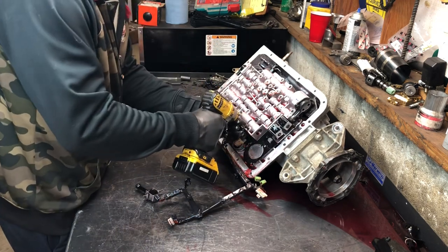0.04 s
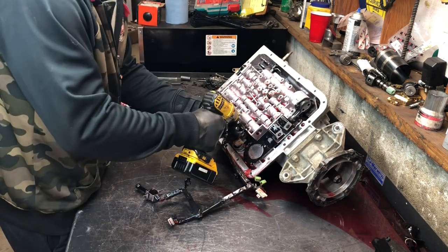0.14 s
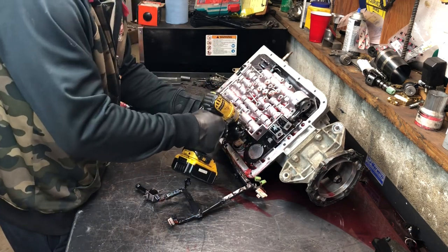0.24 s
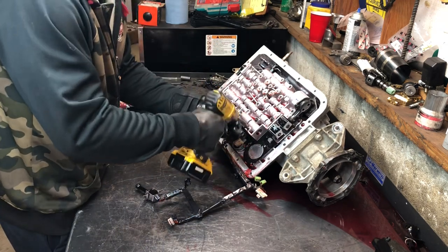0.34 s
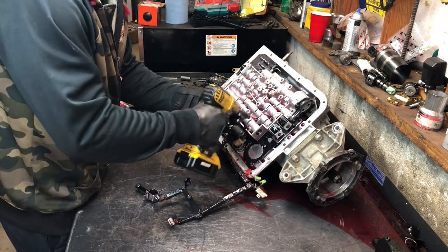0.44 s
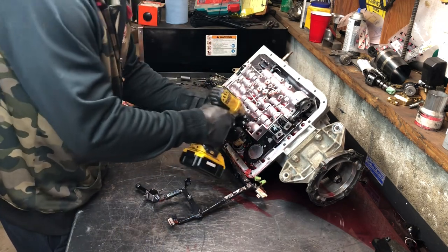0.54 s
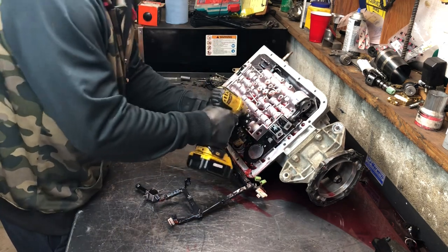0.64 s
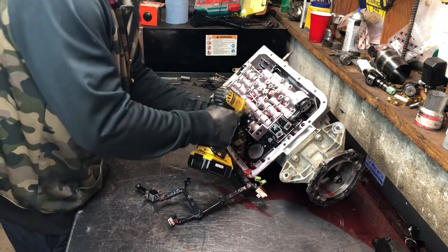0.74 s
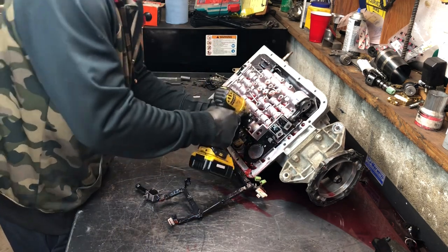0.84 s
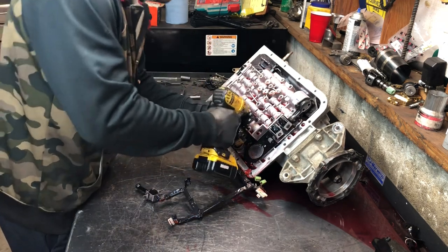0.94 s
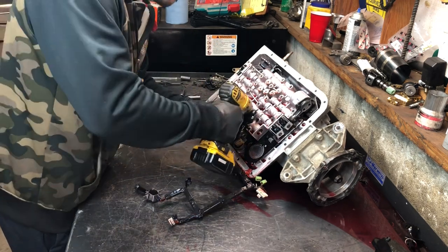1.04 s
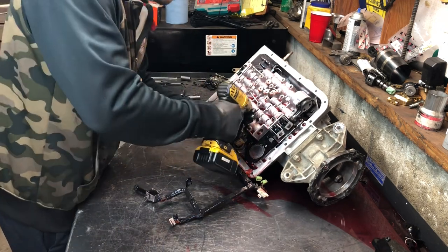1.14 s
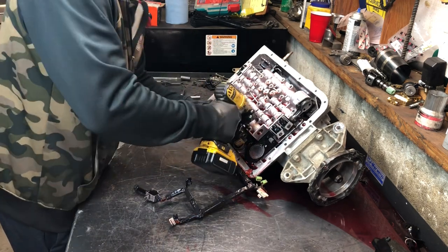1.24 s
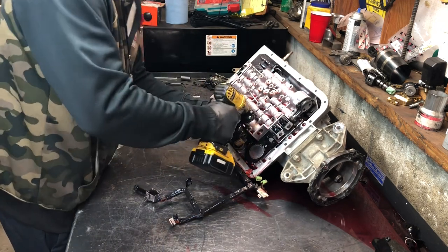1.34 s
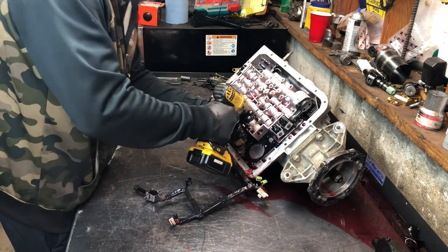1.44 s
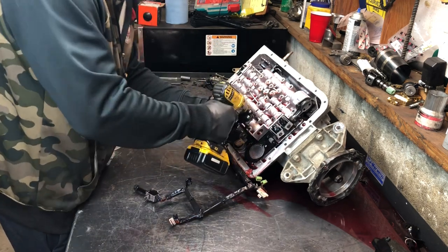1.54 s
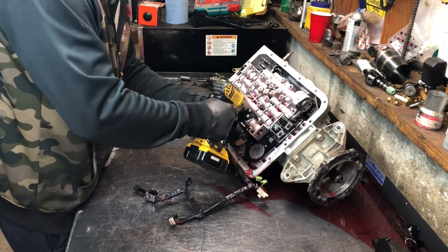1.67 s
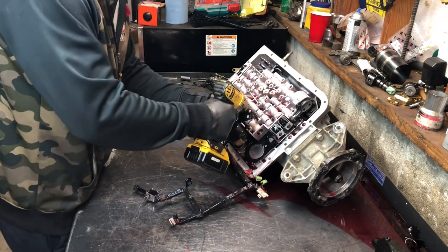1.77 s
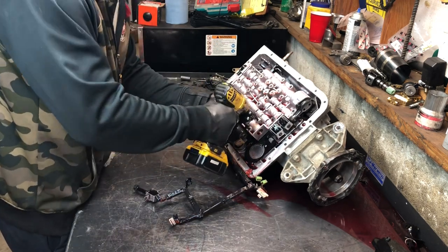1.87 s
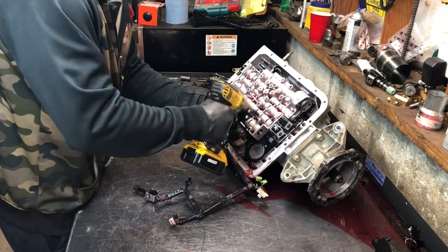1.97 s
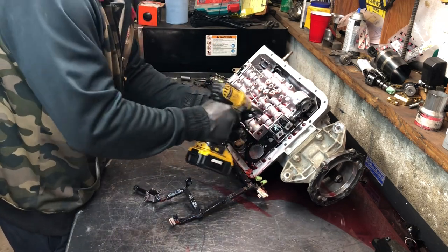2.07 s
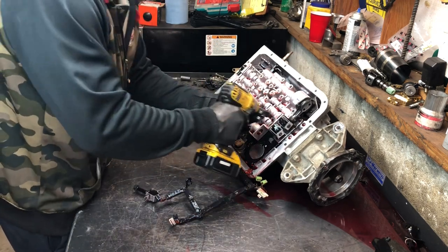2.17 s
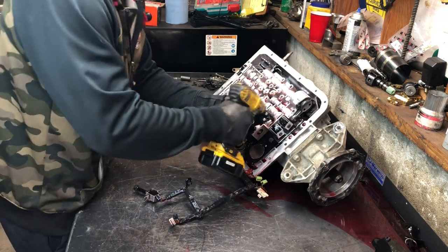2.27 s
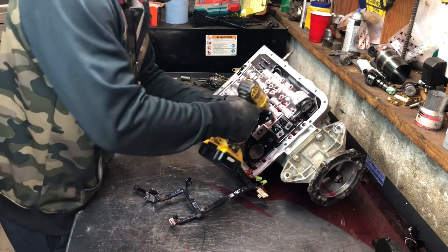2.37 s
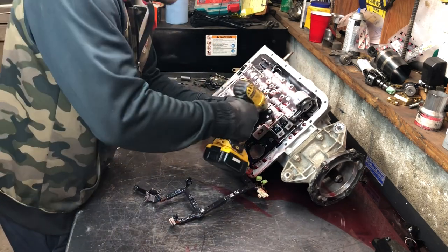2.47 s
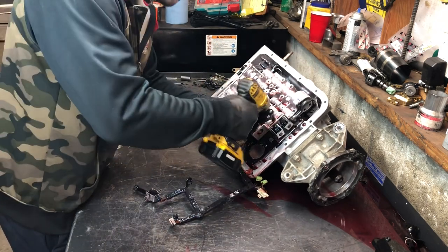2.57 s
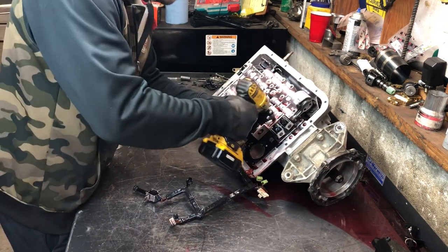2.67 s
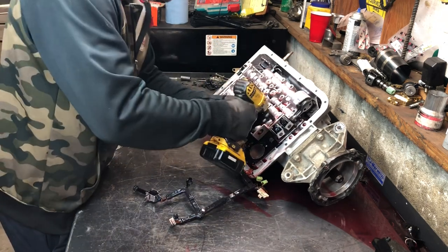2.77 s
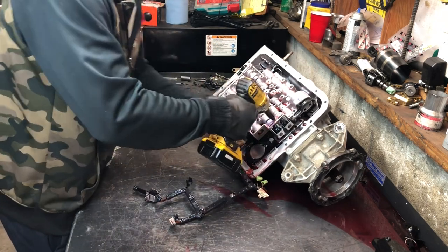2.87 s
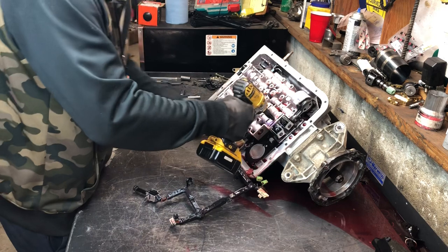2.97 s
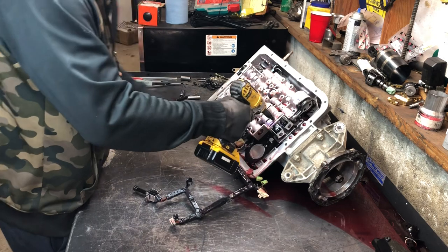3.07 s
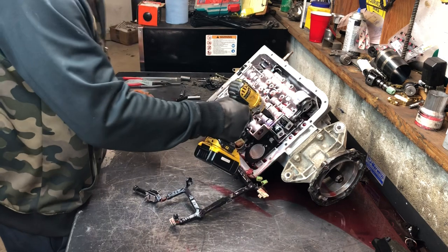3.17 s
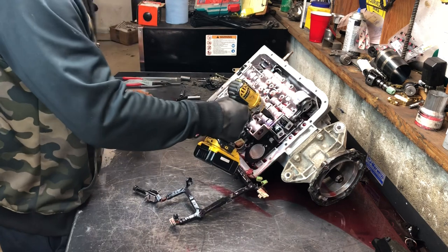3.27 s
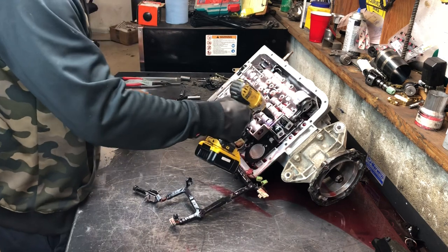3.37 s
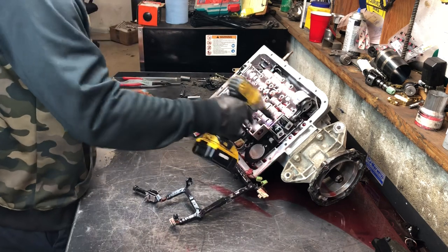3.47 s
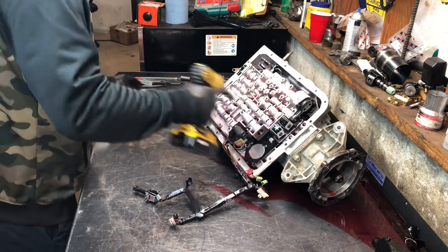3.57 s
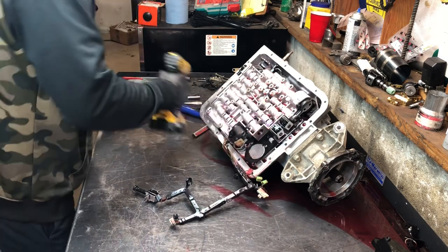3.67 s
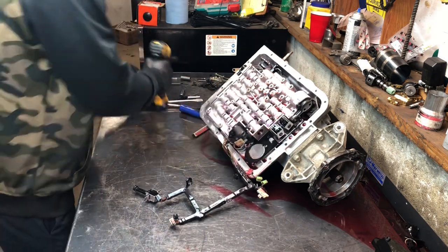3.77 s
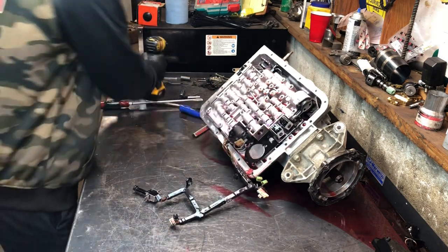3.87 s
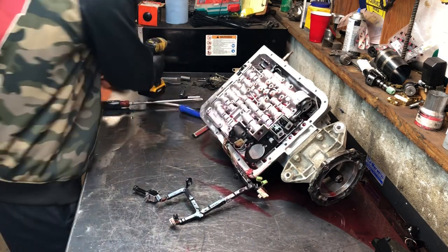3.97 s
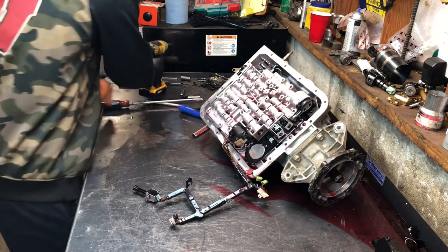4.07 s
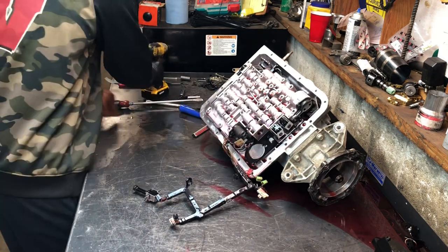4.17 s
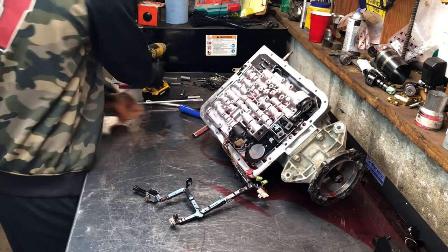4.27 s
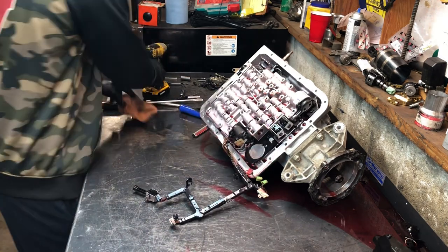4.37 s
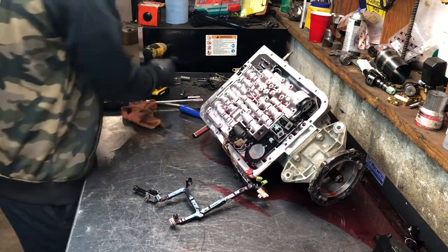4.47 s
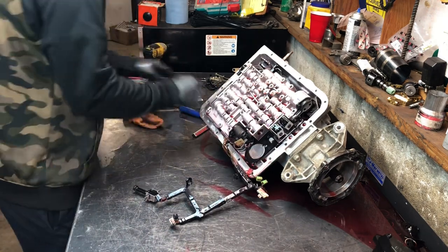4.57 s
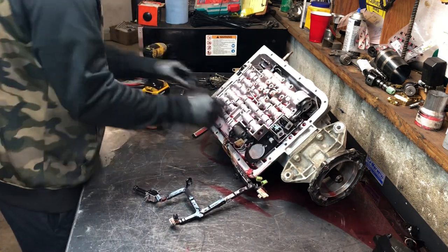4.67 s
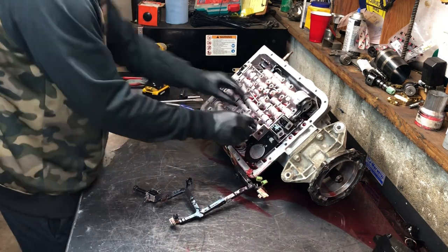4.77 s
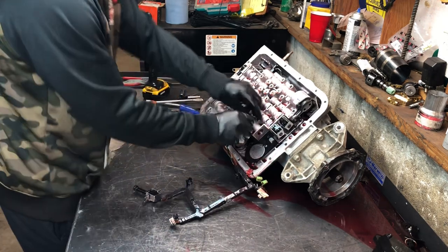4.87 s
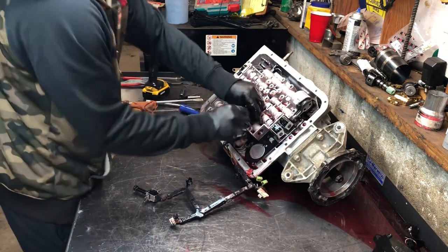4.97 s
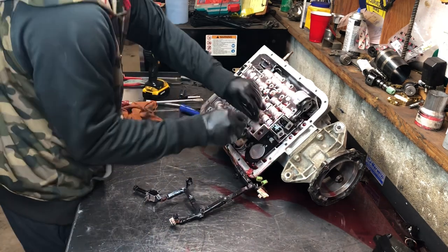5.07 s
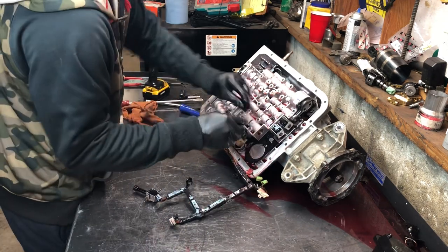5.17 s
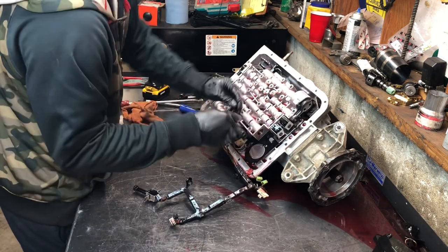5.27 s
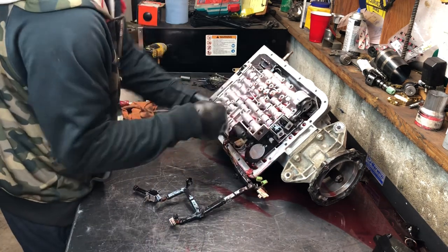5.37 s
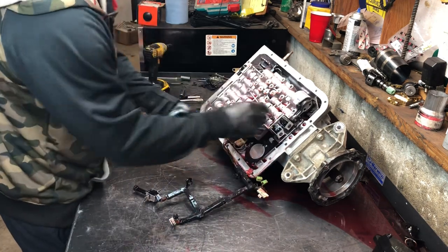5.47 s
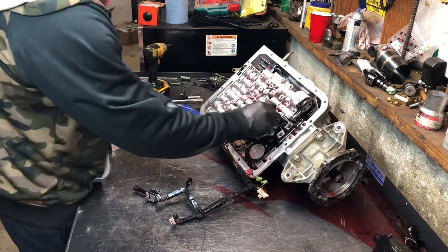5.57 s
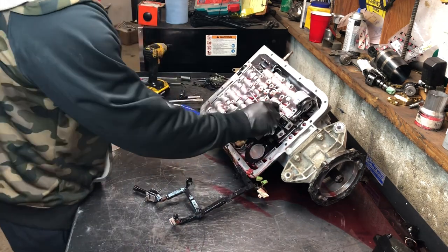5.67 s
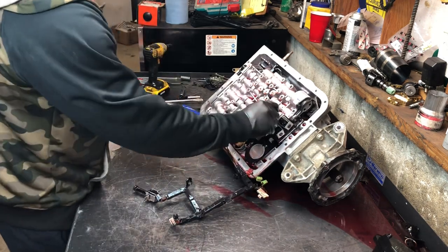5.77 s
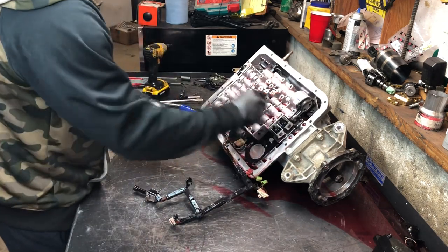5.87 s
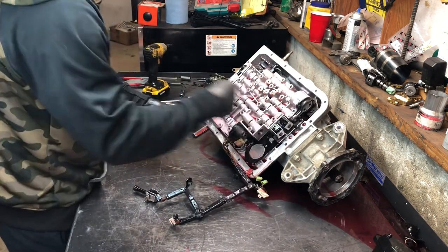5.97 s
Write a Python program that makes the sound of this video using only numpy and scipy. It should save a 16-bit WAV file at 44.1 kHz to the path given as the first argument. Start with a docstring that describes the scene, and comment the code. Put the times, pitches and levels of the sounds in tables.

```python
"""A cordless impact driver spins bolts out of an aluminium transmission on a steel workbench: three runs.
Gear-tooth harmonics whine over pulsed noise; hammer blows are noise cracks with ringing modes.
The socket knocks on metal, a heavy bolt clatters on the bench, the driver is stood down and rattles.
Gloves and cloth brush as noise, then loose bolts clink and scrape in the hand.
A small hard workshop adds reflections, a diffuse tail, standing waves, ventilation noise and hum."""
import sys
import numpy as np
from scipy import signal
from scipy.fft import rfft, irfft
from scipy.io import wavfile
from scipy.ndimage import uniform_filter1d

SR = 44100
rng = np.random.default_rng(int(sys.argv[2]) if len(sys.argv) > 2 else 0)


def to_wav(sig):
    """Store sig (one row per channel, or 1-D mono) as 16-bit WAV at the path in sys.argv[1].

    Samples outside -1..1 are clipped; the rate is SR.
    """
    pcm = np.clip(np.atleast_2d(sig), -1, 1) * 32767
    pcm = np.round(pcm).astype(np.int16)
    wavfile.write(sys.argv[1], SR, pcm.T)  # frames by channels


N = 265466
T = np.arange(N) / SR
HIT = T[:SR]  # time axis of one event, 1 s


def undb(db):
    """Decibels to gain."""
    return 10 ** (np.asarray(db) / 20)


def unit(x):
    """Scale to rms 1."""
    return x / np.sqrt(np.mean(x ** 2))


def noise():
    """White noise for the whole scene."""
    return rng.standard_normal(N)


def fade(t, t60):
    """Exponential decay that begins at t = 0."""
    return np.exp(-np.log(1000) * np.maximum(t, 0) / t60)


def gate(start, end, rise, t60):
    """Swell from the start, hold, and die away after the end."""
    return np.clip((T - start) / rise, 0, 1) * fade(T - end, t60)


def walk(rate):
    """Smoothed random drift of rms 1, with rate new values per second."""
    size = max(int(SR / rate), 1)
    steps = np.repeat(rng.standard_normal(N // size + 1), size)
    return unit(uniform_filter1d(steps, size)[:N])


def colour(x, points, tilt_db=0, size=4096):
    """Causal minimum-phase filter of unit power through (Hz, dB) points, tilted in dB per octave."""
    octave = np.log2(np.maximum(np.fft.rfftfreq(size, 1 / SR), 1))
    hz, db = np.transpose(points)
    gain = unit(undb(np.interp(octave, np.log2(hz), db) + tilt_db * octave))
    # fold the cepstrum to put all energy as early as possible
    cepstrum = irfft(np.log(gain + 1e-9))
    cepstrum[1:size // 2] *= 2
    cepstrum[size // 2 + 1:] = 0
    impulse = irfft(np.exp(rfft(cepstrum)))
    return signal.fftconvolve(x, impulse)[:len(x)]


def ring(modes):
    """Struck modes; every blow shares its force among them a little differently."""
    shares = undb(rng.standard_normal(len(modes))) * rng.choice([-1, 1], len(modes))
    out = np.zeros(len(HIT))
    for share, (hz, db, t60) in zip(shares, modes):
        out += share * undb(db) * np.sin(2 * np.pi * hz * HIT) * fade(HIT, t60)
    return out


def add(track, s, sound):
    """Mix a sound in at time s."""
    start = int(s * SR)
    track[start:start + len(sound)] += sound[:N - start]


RING_DB = -21  # gain of the lasting ring beside the crack, before any muting


def strikes(rows, points, modes, rise, mute_db=0):
    """Each blow (s, dB, tilt dB per octave, crack t60 s): a noise crack plus the few modes that ring on."""
    out = np.zeros(N)
    for s, db, tilt_db, t60 in rows:
        force = np.tanh(2 * rng.standard_normal(len(HIT))) * 1.25
        crack = colour(force * fade(HIT, t60), points, tilt_db)
        lasting = undb(RING_DB + mute_db) * ring(modes)
        add(out, s, undb(db) * (crack + lasting) * np.minimum(HIT / rise, 1))
    return out


# Ventilation spectrum. Each row: frequency in Hz, relative density in dB per Hz.
SHOP_COLOUR = [(18, -24.5), (30, 8.5), (244, -4), (294, -2), (372, -1), (795, -6), (860, -8), (1340, -3.5),
               (1840, -9.5), (2210, -10.5), (2950, -12.5), (3830, -12.5), (15800, -28.5)]
SHOP_DB = -60


def shop():
    """Steady ventilation noise with a faint mains hum at 119 Hz and a wavering tone at 958 Hz."""
    air = colour(noise(), SHOP_COLOUR) * undb(SHOP_DB + .6 * walk(2))
    hum = undb(-71.5) * np.sin(2 * np.pi * 119 * T)
    tone = undb(-73.5 + 3 * walk(9.8)) * np.sin(2 * np.pi * 958 * T)
    return air + hum + tone


# Tight bolts that need the hammer. Each row: first blow in seconds, breaks loose in seconds, blows per second.
TIGHT_BOLTS = [(1.0622, 1.2011, 31.8), (2.611, 2.779, 32.3)]
RECOVER_S = .19  # time constant


def thread_drag():
    """Drag on the motor, 0-1: full while a bolt is tight, easing off once it has broken loose."""
    drags = []
    for first, loose, _ in TIGHT_BOLTS:
        easing = np.exp(-np.maximum(T - loose, 0) / RECOVER_S)
        drags.append((T > first - .1) * easing)
    return np.max(drags, axis=0)


# Trigger pulls. Each row: start in seconds, release in seconds, level in dB, free-running gear mesh in Hz,
# whine in dB re gear noise, bolt comes free in seconds, its wobble in dB, case drone in dB, brake squeal in dB.
TRIGGER_PULLS = [(-.2, 0.424, -30, 1292, -9, .17, -41, -52, -39),
                 (1.04, 2.023, -28.5, 1312, -5, 1.76, -46, -59.5, -40),
                 (2.595, 3.484, -28.5, 1302, -4, 3.16, -41, -44, -45.5)]
# Gear whine. Each row: multiple of the mesh, level running free in dB, level under load in dB.
WHINE_HARMONICS = [(1, -7, -7.5), (2, -12.5, -5.5), (3, -13, -11), (4, -14, -11), (5, -20, -21),
                   (6, -18, -21)]
# Gear noise and loose-bolt spectra. Each row: frequency in Hz, relative density in dB per Hz.
GEAR_COLOUR = [(40, -23.5), (80, -9.5), (160, -21.5), (230, -15.5), (350, -9.5), (600, -23), (860, -11),
               (1050, -15), (1300, -9.5), (1900, -14), (3200, -9), (3750, -8), (5050, -6), (5600, -9.5),
               (7400, -7), (8500, -10.5), (15800, -12.5)]
WOBBLE_COLOUR = [(50, -20), (90, -7), (155, -2), (230, -3), (360, -2), (600, -12), (850, -1), (1400, -4),
                 (3000, -10), (8000, -26)]
SAG_HZ = 135  # loss of mesh frequency at full drag
WHINE_FLUTTER = .0045  # share of the pitch
WHINE_DRAG_DB, WHINE_FREE_DB = 3, -3.5  # lift at full drag, drop once the bolt is free


def driver(run):
    """One trigger pull: gear teeth whine and rattle, the freed bolt wobbles, the brake stops the motor."""
    start, release, db, mesh_hz, whine_db, free, wobble_db, drone_db, brake_db = run
    drag = thread_drag()
    speed_hz = mesh_hz - SAG_HZ * drag
    load = np.minimum(2 * drag, 1)
    hz = speed_hz * fade(T - release, 1.6) * (1 + WHINE_FLUTTER * walk(70))
    teeth = 2 * np.pi * np.cumsum(hz) / SR
    spindle = teeth / 32

    # load presses the teeth together, which lifts the octave
    whine = np.zeros(N)
    for k, free_db, loaded_db in WHINE_HARMONICS:
        level_db = free_db + load * (loaded_db - free_db) + 2 * walk(50)
        whine += undb(level_db) * np.sin(k * teeth + .07 * k * walk(150))
    whine *= undb(WHINE_DRAG_DB * drag + WHINE_FREE_DB * np.clip((T - free) / .15, 0, 1))

    # rattle pulses with each tooth and swells with each spindle turn
    pulses = (1 + .5 * np.sin(teeth)) * (1 + .16 * np.sin(spindle))
    rattle = noise() * pulses * undb(1.3 * walk(300))
    # tooth errors repeat every turn: a dense comb of faint lines
    errors = rng.standard_normal(int(SR / 40))
    turning = np.interp(spindle / (2 * np.pi), np.arange(len(errors)) / len(errors), errors, period=1)
    gear_noise = colour(unit(rattle + 0.65 * turning), GEAR_COLOUR)
    gears = undb(db) * (gear_noise + undb(whine_db) * whine) * gate(start, release, 0.033, 0.23)

    # out of its thread the bolt knocks about, and the case drones on the bench
    knocking = noise() * undb(3.5 * np.sin(spindle / 2) + 2 * walk(90))
    wobble = undb(wobble_db) * colour(knocking, WOBBLE_COLOUR)
    drone_colour = [(90, -32.5), (135, -8.5), (152, 4.5), (172, -5), (260, -34), (900, -69.0)]
    drone = undb(drone_db) * colour(noise(), drone_colour)
    freed = (wobble + drone) * gate(free, release - .03, 0.01, 0.11)

    squeal_colour = [(900, -32.0), (1250, -15), (1620, -6), (1900, -10.5), (3000, -36.5)]
    squeal = undb(brake_db) * colour(noise(), squeal_colour)
    return gears + freed + squeal * gate(release, release + 0.051, 0.013, 0.14)


# The socket knocks on metal as it is seated, fumbled about or lifted off.
# Each row: time in seconds, level in dB, crack t60 in seconds.
SOCKET_KNOCKS = [(.6688, -16, .026), (.899, -43, 0.018), (1.01, -37.5, 0.063), (1.0559, -18, 0.023),
                 (2.2975, -18, .031), (2.463, -45, 0.12), (2.5619, -35, 0.066), (3.468, -33, 0.062),
                 (3.497, -32, 0.14)]
# Socket crack spectrum. Each row: frequency in Hz, relative density in dB per Hz.
SOCKET_COLOUR = [(50, -29), (110, -15), (400, -10), (700, -10), (900, -0.5), (1400, -2), (2150, -7.5),
                 (2850, -2.5), (4300, -10), (6800, -15.5), (8600, -20.5), (9800, -13), (11300, -24),
                 (15800, -38.5)]
# Transmission case. Each row: mode in Hz, level in dB, t60 in seconds.
CASE_MODES = [(915, -2, .19), (1071, -1, .16), (1400, -7, .1), (1739, -18, .3), (2826, -12, .25),
              (3025, -5, .1), (3440, -20, .2), (4070, -13, .1), (4942, -11, .07), (9500, -21, .26),
              (9798, -15, .2)]
KNOCK_TILT_DB_PER_OCTAVE = -1.07
SLACK_DB, SLACK_T60_S = -25, 0.12


def socket():
    """The socket knocks on the case as it is handled, and takes up its slack when the motor starts."""
    knocks = [(s, db, KNOCK_TILT_DB_PER_OCTAVE, t60) for s, db, t60 in SOCKET_KNOCKS]
    slack = [(start, SLACK_DB, 0, SLACK_T60_S) for start, *_ in TRIGGER_PULLS if start > 0]
    return strikes(knocks + slack, SOCKET_COLOUR, CASE_MODES, rise=0.00065)


# A heavy bolt drops, tumbles and knocks. Each row: time in seconds, level in dB, crack t60 in seconds.
CLATTER = [(3.787, -27.5, 0.061), (3.803, -28.5, .11), (3.833, -31.5, 0.32), (3.891, -33, .15),
           (3.9273, -4.5, 0.033), (3.945, -20, 0.13)]
# Low thud spectrum. Each row: frequency in Hz, relative density in dB per Hz.
THUD_COLOUR = [(30, -18.5), (85, -2), (200, -4.5), (300, -1.5), (450, -0.5), (700, -2), (1200, -4.5),
               (2200, -15.5), (5000, -27.5), (15000, -46.5)]
# Bench top and its load of tools. Each row: mode in Hz, level in dB, t60 in seconds.
BENCH_MODES = [(82, 0, .25), (132, -5, .35), (215, -8, .35), (295, -7, .35), (440, -3, .22), (472, -4, .22),
               (614, -4, .28), (668, -9, .3), (795, -5, .28), (856, -7, .3), (925, -6, .3), (1061, -8, .3),
               (1222, -6, .3), (1335, -12, .3), (1440, -11, .3)]
KNOCK_BOOM_DB, CLATTER_BOOM_DB = -27, -17  # re the knock
BOOM_TILT_DB_PER_OCTAVE, BOOM_T60_S = -1.5, 0.3


def bench_boom():
    """The steel top booms softly under every listed knock of socket or dropped bolt."""
    knocks = [(s, db + KNOCK_BOOM_DB) for s, db, _ in SOCKET_KNOCKS]
    knocks += [(s, db + CLATTER_BOOM_DB) for s, db, _ in CLATTER]
    rows = [(s, db, BOOM_TILT_DB_PER_OCTAVE, BOOM_T60_S) for s, db in knocks]
    return strikes(rows, THUD_COLOUR, BENCH_MODES, rise=0.0036)


# Hammer blow spectrum. Each row: frequency in Hz, relative density in dB per Hz.
ANVIL_COLOUR = [(30, -35.5), (70, -12.5), (350, -13.5), (650, -12), (900, -2), (1450, -1), (2200, -0.5),
                (3850, 1), (7000, -4.5), (9200, -12.5), (12000, -13.5), (15800, -19)]
# Anvil. Each row: mode in Hz, level in dB, t60 in seconds.
ANVIL_MODES = [(1456, -4, 0.17), (1900, -5.5, .06), (3240, -8, 0.062), (3790, 0.5, 0.11), (4410, -13, .08)]
# the first blow bites, the rest bounce off hard, the last gives way dully; tilts in dB per octave
FIRST_BLOW_DB, FIRST_TILT_DB = -5.5, 0.4
BLOW_DB, BLOW_TILT_DB, BLOW_SCATTER_DB = -8, 5.5, 1.9
LAST_BLOW_DB, LAST_TILT_DB = -9, -0.5
BLOW_T60_S, CAM_DB = 0.025, -18
HAMMER_BOOM_DB = -30.5  # re the blow


def hammer():
    """The hammer hits the anvil at a steady rate until the bolt gives, grinding up its cam in between."""
    blows, strain = [], 0
    for first, loose, rate in TIGHT_BOLTS:
        beats = np.arange(first, loose, 1 / rate)
        blows.append((first, FIRST_BLOW_DB, FIRST_TILT_DB, BLOW_T60_S))
        blows.append((loose, LAST_BLOW_DB, LAST_TILT_DB, BLOW_T60_S))
        for s in beats[1:]:
            db = BLOW_DB + BLOW_SCATTER_DB * rng.standard_normal()
            blows.append((s, db, BLOW_TILT_DB, BLOW_T60_S))
        # free rebound after each blow: the grinding dips
        rebound = sum(np.exp(-((T - s - .009) / .006) ** 2) for s in beats)
        strain = strain + undb(CAM_DB - 8 * rebound) * gate(first, loose, .004, 0.24)
    grind = colour(noise() * undb(3.5 * walk(220)), ANVIL_COLOUR, tilt_db=-0.45)
    boom_rows = [(s, db + HAMMER_BOOM_DB, BOOM_TILT_DB_PER_OCTAVE, BOOM_T60_S) for s, db, *_ in blows]
    boom = strikes(boom_rows, THUD_COLOUR, BENCH_MODES, rise=.005, mute_db=-3)
    return strikes(blows, ANVIL_COLOUR, ANVIL_MODES, rise=0.00013) + boom + strain * grind


# Bolt-on-bench crack spectrum. Each row: frequency in Hz, relative density in dB per Hz.
BENCH_COLOUR = [(35, -21), (60, -22.5), (632, -11), (780, -3), (985, -6.5), (1460, -8), (1980, -8.5),
                (2180, -9), (3810, -10.5), (4090, -10.5), (5800, -9), (15800, -33.5)]
CLATTER_TILT_DB_PER_OCTAVE = 3  # hardest contact
TILT_LOSS_PER_DB = 0.21  # fall of that tilt per dB of lost force


def dropped_bolt():
    """A bolt clatters, harder contacts brighter, with only a faint ring beside each crack."""
    hardest_db = max(db for _, db, _ in CLATTER)
    contacts = []
    for s, db, t60 in CLATTER:
        tilt_db = CLATTER_TILT_DB_PER_OCTAVE - TILT_LOSS_PER_DB * (hardest_db - db)
        contacts.append((s, db, tilt_db, t60))
    return strikes(contacts, BENCH_COLOUR, BENCH_MODES, rise=.0002, mute_db=-14)


# The driver rocks as it is stood down. Each row: contact in seconds, socket rattle in dB.
ROCKING = [(4.174, -26), (4.185, -15), (4.1911, -6.5), (4.211, -17), (4.2345, -7), (4.2566, -11.5),
           (4.341, -32)]
# Rattle spectrum. Each row: frequency in Hz, relative density in dB per Hz.
TOOL_COLOUR = [(100, -22), (1200, 2.5), (3700, -8), (4400, -2), (4900, -4), (5400, -5.5), (6150, -11.5),
               (6800, 0.5), (7400, -9), (7900, -6.5), (8700, -12), (11000, -22), (15800, -26)]
# Driver and socket. Each row: mode in Hz, level in dB, t60 in seconds.
TOOL_MODES = [(4420, -5, .09), (5350, -8, .07), (6750, -2, .08), (6795, 0, .08), (7900, -5, .07)]
RATTLE_TILT_DB_PER_OCTAVE, RATTLE_T60_S = 2.5, 0.032
THUD_DB, THUD_T60_S = -12, 0.12  # level at the first contact
SETTLE_DB_PER_S, DULLING_DB_PER_OCTAVE_S = 79, 22.5


def stood_down():
    """Each contact rattles the socket, now harder, now lighter, over thuds that grow weaker and duller."""
    landing = ROCKING[0][0]
    rattles = [(s, db, RATTLE_TILT_DB_PER_OCTAVE, RATTLE_T60_S) for s, db in ROCKING]
    thuds = []
    for s, _ in ROCKING:
        settled = s - landing
        thud_db = THUD_DB - SETTLE_DB_PER_S * settled
        thuds.append((s, thud_db, -DULLING_DB_PER_OCTAVE_S * settled, THUD_T60_S))
    shaking = strikes(rattles, TOOL_COLOUR, TOOL_MODES, rise=0.00045, mute_db=-9.5)
    return shaking + strikes(thuds, THUD_COLOUR, BENCH_MODES, rise=0.003, mute_db=-0.5)


def sleeves():
    """Cloth and gloves brush softly, as fluctuating noise, while the arms reach for the bolts."""
    brush = colour(noise(), [(200, -9), (900, 5.5), (3000, -2.5), (7000, -8), (15000, -19.5)])
    return brush * undb(-66.5 + 3.2 * walk(19) + 2 * walk(200)) * gate(4.47, 5.5, 0.21, .5)


# Sliding steel spectrum. Each row: frequency in Hz, relative density in dB per Hz.
STEEL_COLOUR = [(150, -21.5), (700, -20), (1000, -10.5), (2100, -17), (2900, -12), (5800, -15),
                (6900, -6.5), (8200, -15.5), (12000, -18), (15800, -13.5)]


def slips(length, swell_db=0):
    """Steel slides on steel in tiny slips for the given time."""
    grain = rng.standard_normal(len(HIT)) * undb(1.75 * walk(700)[:len(HIT)])
    swell = undb(swell_db * np.minimum(HIT / length - 1, 0))
    return colour(grain * swell * fade(HIT - length, 0.019), STEEL_COLOUR)


# Loose bolts tap each other. Each row: time in seconds, click in dB, ring in dB, glove damping t60 in seconds.
CLINKS = [(4.9945, -47.5, -47, .2), (5.051, -36, -25, 0.089), (5.1237, -40, -48, .1),
          (5.5357, -35.5, -27.5, 1.5), (5.6796, -53.5, -44, .6), (5.849, -47.5, -62, .1),
          (5.948, -37.5, -37, .1)]
# Threads slide over each other. Each row: start in seconds, length in seconds, level in dB.
SCRAPES = [(5.021, .045, -34.5), (5.161, 0.043, -40), (5.936, 0.026, -40)]
# Hanging bolt shank before glove damping. Each row: mode in Hz, level in dB, t60 in seconds.
BOLT_MODES = [(6901, -12, .45), (6950, -7, .12), (6870, 1, .055), (6729, -24, .3), (7908, -32, .3)]
CLINK_S, SCRAPE_SWELL_DB = 0.0018, 7


def bolts():
    """Bolts in the hand tap and ring, and scrape thread on thread, harder towards the end."""
    out = np.zeros(N)
    for s, click_db, ring_db, t60 in CLINKS:
        click = undb(click_db) * slips(CLINK_S)
        damped_ring = undb(ring_db) * ring(BOLT_MODES) * fade(HIT, t60)
        add(out, s, click + damped_ring)
    for s, length, db in SCRAPES:
        add(out, s, undb(db) * slips(length, SCRAPE_SWELL_DB))
    return out


# Decay of the workshop. Each row: frequency in Hz, t60 in seconds.
ROOM_T60 = [(60, .85), (160, .66), (420, .56), (1100, .56), (2900, .55), (5000, .52), (8000, .37),
            (15000, .23)]
# Standing waves. Each row: mode in Hz, level in dB, t60 in seconds.
ROOM_MODES = [(88.5, 0, .75), (140, -2, .6), (165, -7, .5), (226, -9, .5)]


def room(x, wet_db, early_db, boom_db):
    """Quick reflections, a diffuse tail whose treble dies first, and slowly building standing waves."""
    hz, t60s = np.transpose(ROOM_T60)
    log_hz = np.log(np.maximum(np.fft.rfftfreq(len(HIT), 1 / SR), 1))
    spectrum = rfft(rng.standard_normal(len(HIT)))
    # overlapping bands, each with its own decay
    tail = np.zeros(len(HIT))
    for share, t60 in zip(np.eye(len(hz)), t60s):
        band = irfft(spectrum * np.interp(log_hz, np.log(hz), share), len(HIT))
        tail += band * fade(HIT, t60)
    tail = unit(tail * np.minimum(HIT / 0.014, 1))
    # sparse echoes off bench and wall
    echoes = rng.standard_normal(len(HIT)) * (rng.random(len(HIT)) < .05)
    early = unit(echoes * (HIT > .003) * fade(HIT, 0.06))
    boom = unit(ring(ROOM_MODES) * np.minimum(HIT / 0.02, 1))
    response = undb(wet_db) * tail + undb(early_db) * early + undb(boom_db) * boom
    return x + signal.fftconvolve(x, response)[:N] / np.sqrt(len(HIT))


def scene():
    """Work at the transmission is close; the bench behind it is further off and wetter."""
    tool = sum(driver(run) for run in TRIGGER_PULLS) + hammer()
    near = room(tool, wet_db=-13, early_db=-16, boom_db=-27)
    hands = room(socket() + bolts() + sleeves(), wet_db=-13.0, early_db=-10.0, boom_db=-20)
    bench = room(dropped_bolt() + stood_down() + bench_boom(), wet_db=-6.5, early_db=-8, boom_db=-27)
    mono = near + hands + bench + shop()
    return np.array([mono, mono])


TOP_HZ = 15800


def record(dry):
    """A mono phone microphone drops the deep bass, rounds the highest peaks and cuts the top."""
    thin = signal.sosfilt(signal.butter(3, 42, "high", fs=SR, output="sos"), dry)
    rounded = np.tanh(0.92 * thin) / 0.91
    return signal.sosfilt(signal.ellip(10, .1, 80, TOP_HZ, fs=SR, output="sos"), rounded)


dry = scene()
out = record(dry)
to_wav(out)
```